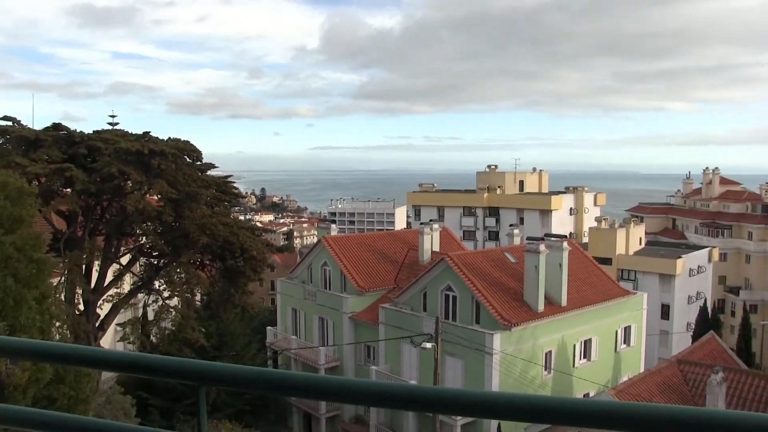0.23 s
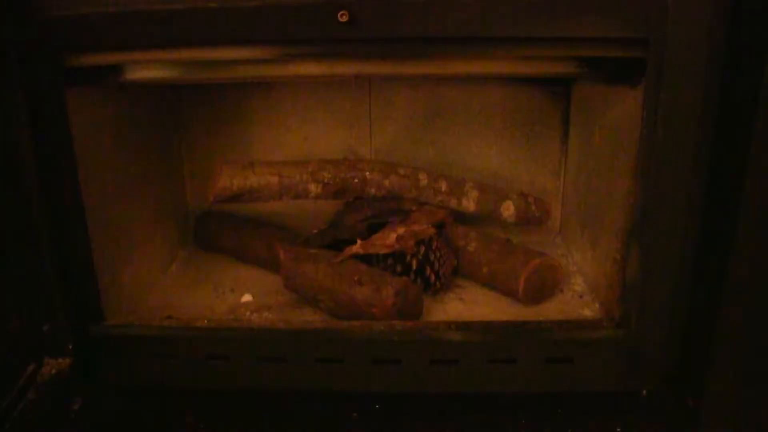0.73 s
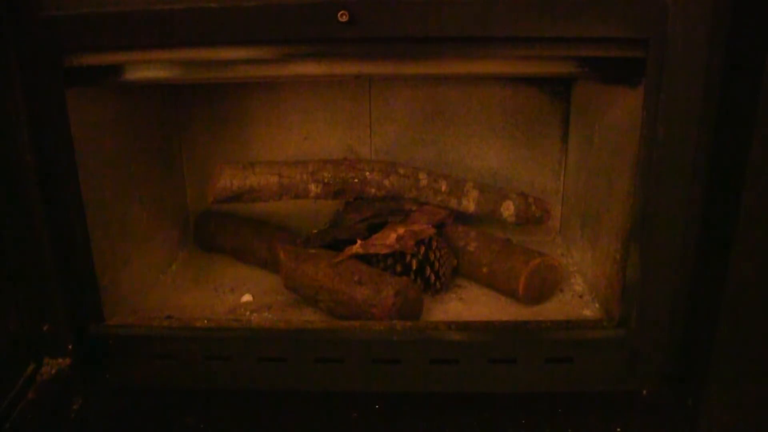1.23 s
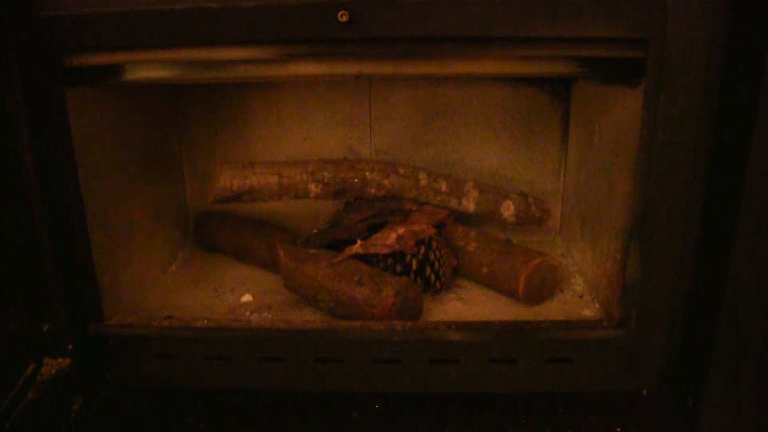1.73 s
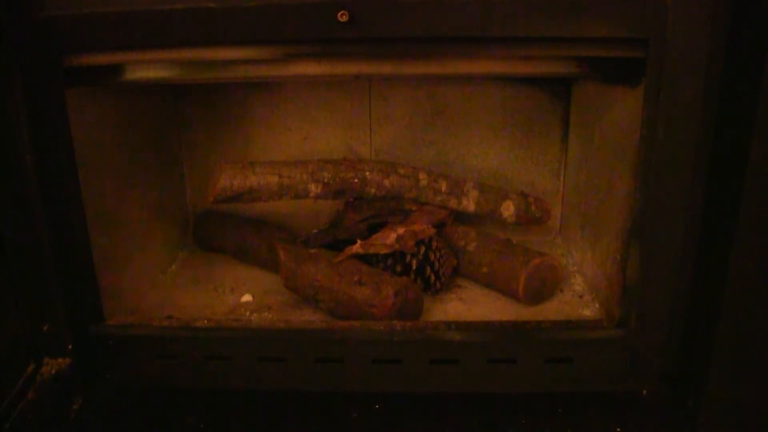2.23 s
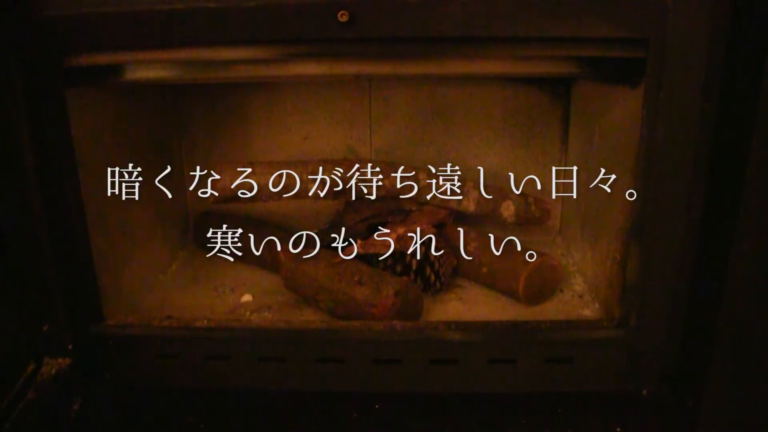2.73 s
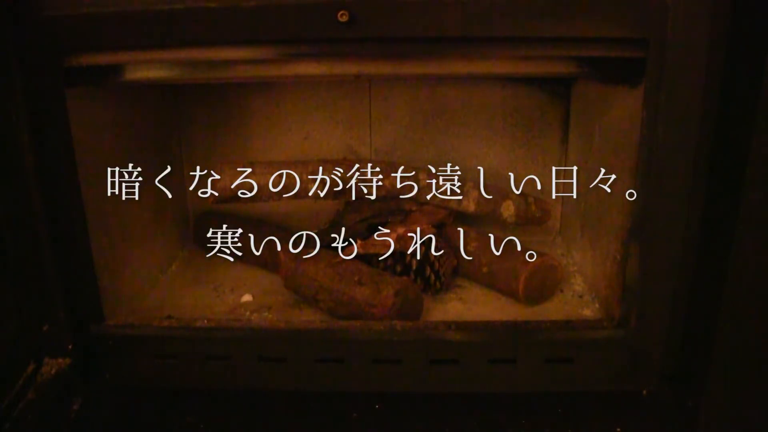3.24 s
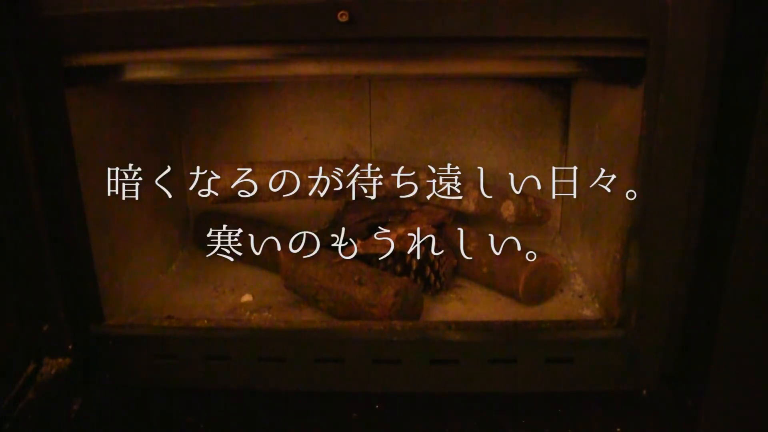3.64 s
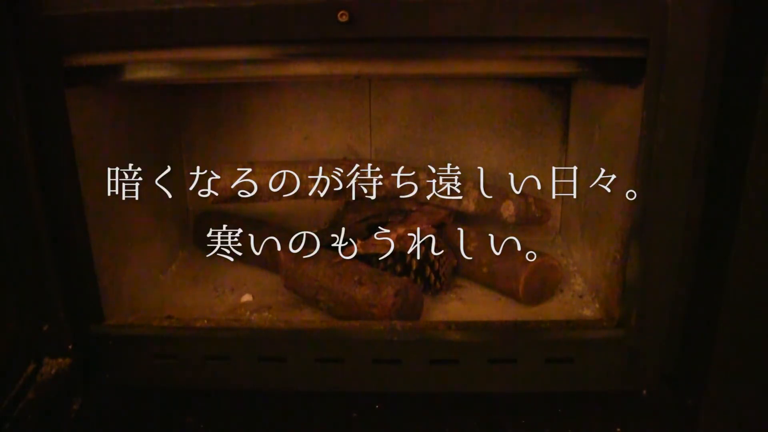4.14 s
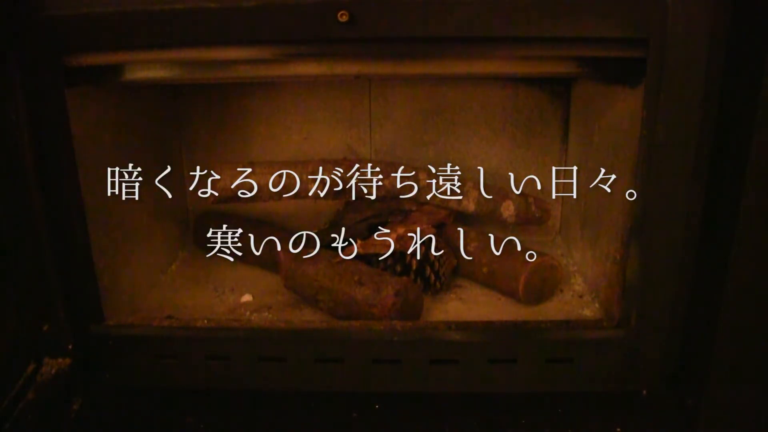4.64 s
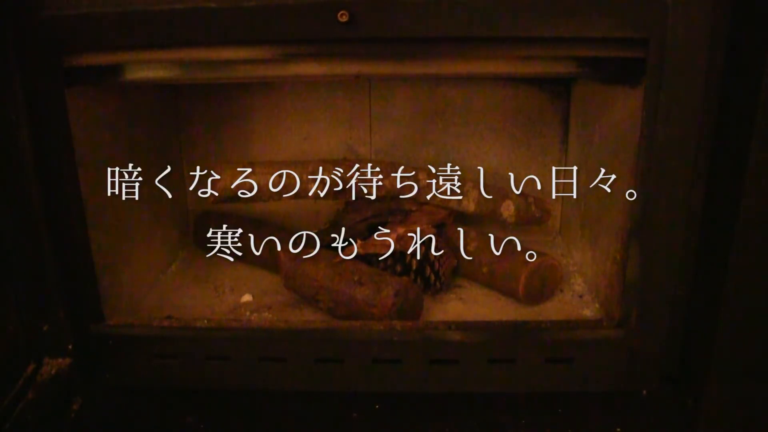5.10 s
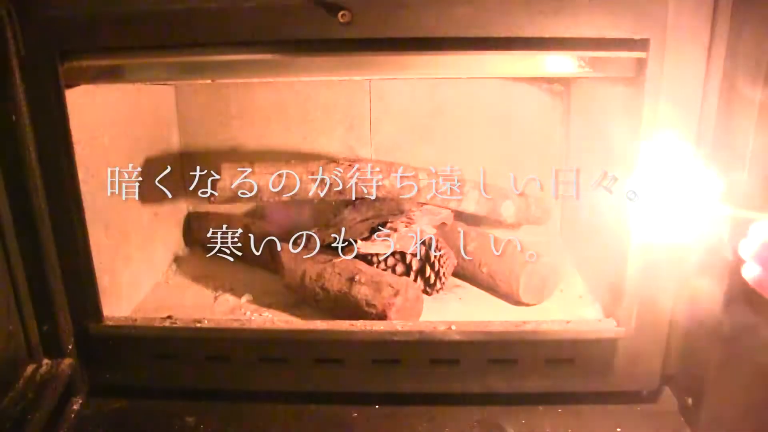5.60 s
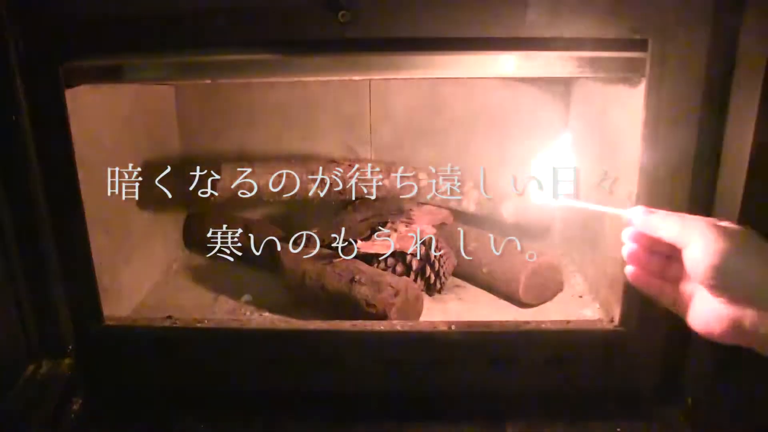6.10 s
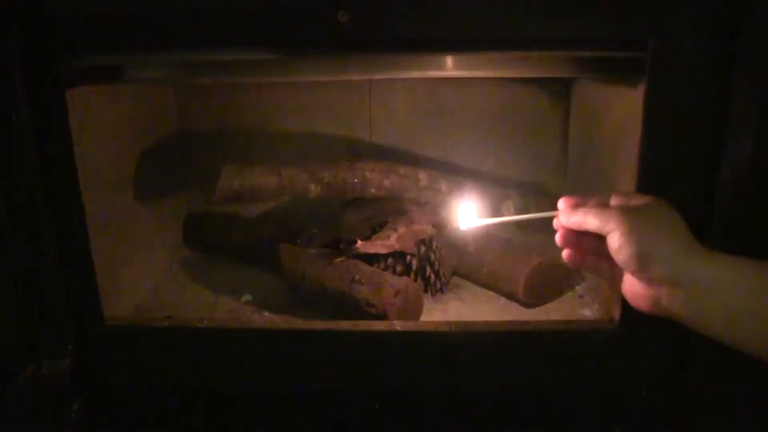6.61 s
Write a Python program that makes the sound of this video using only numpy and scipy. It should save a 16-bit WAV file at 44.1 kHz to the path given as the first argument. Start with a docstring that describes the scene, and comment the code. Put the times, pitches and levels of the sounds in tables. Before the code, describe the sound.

After brief seaside birdsong, cardboard matchbox clicks and rustles indoors; two short match scrapes, a crackling flare, a hard knock and soft flame hiss.

```python
"""Outdoors, surf and a whistling bird are heard; then a quiet, echoing room with a cold stove.
A cardboard matchbox is handled and a wooden match is struck twice; the second stroke lights it.
The head sputters, the box is put down with a knock, and the flame hisses on.
Surf, flame and steady hiss are coloured noise; the bird is gliding tones.
Box and match are small knocks and slips that set resonances ringing, with echoes added."""
import sys
import numpy as np
from scipy import signal
from scipy.fft import rfft, irfft
from scipy.io import wavfile
from scipy.ndimage import uniform_filter1d

SR = 44100
rng = np.random.default_rng(int(sys.argv[2]) if len(sys.argv) > 2 else 0)


def waveform_to_disk(signal):
    """Save audio, clipped to [-1, 1], as 16-bit WAV at the path in sys.argv[1]."""
    frames = np.transpose(np.atleast_2d(signal))
    scaled = np.clip(frames, -1, 1) * 32767
    samples = np.round(scaled).astype(np.int16)
    wavfile.write(sys.argv[1], SR, samples)


N = 302526
TIME = np.arange(N) / SR


def from_db(db):
    """Turn decibels into a plain gain."""
    return 10 ** (np.asarray(db) / 20)


def rms_one(x):
    """Scale a sound to an rms level of 1."""
    return x / np.sqrt(np.mean(x ** 2) + 1e-20)


def level(rows):
    """Gain over time, gliding between rows of (t/s, level/dB) and held before and after them."""
    return from_db(np.interp(TIME, *np.transpose(rows)))


def swells(rows, attack_s, release_s):
    """Gain over time of gestures (t/s, length/s, level/dB) that rise, hold and die away."""
    out = 0
    for s, length, db in rows:
        t = np.maximum(TIME - s, 0)
        rise = 1 - np.exp(-t / attack_s)
        fall = np.exp(-np.maximum(t - length, 0) / release_s)
        out = out + from_db(db) * rise * fall
    return out


def at_hz(points, hz):
    """Read a table of (f/Hz, value) between its points, on a log-frequency axis."""
    freqs, values = np.transpose(points)
    return np.interp(np.log(hz + 1e-9), np.log(freqs), values)


def stereo_noise(colour, likeness, size):
    """Noise coloured by frequency; a shared part and an opposed part set how alike left and right are."""
    hz = np.fft.rfftfreq(size, 1 / SR)
    mid, side = rfft(rng.standard_normal((2, size)))
    alike = np.clip(at_hz(likeness, hz), -1, 1)
    pair = np.sqrt(1 + alike) * mid + np.sqrt(1 - alike) * side * [[1], [-1]]
    return rms_one(irfft(pair * from_db(at_hz(colour, hz)), size))


def glides(rows, tremble):
    """Short trembling tones (t/s, length/s, first f/Hz, last f/Hz, level/dB) that swell and fade."""
    out = np.zeros(N)
    for s, length, first_hz, last_hz, db in rows:
        unsteady = rms_one(uniform_filter1d(rng.standard_normal(N), size=64))
        along = np.clip((TIME - s) / length, 0, 1)
        pitch = (first_hz + (last_hz - first_hz) * along) * (1 + tremble * unsteady)
        tone = np.sqrt(2) * np.sin(2 * np.pi * np.cumsum(pitch) / SR)
        out += from_db(db) * np.sin(np.pi * along) * tone
    return out


def resonate(x, modes):
    """Ring side-by-side resonances (f/Hz, width/Hz, level/dB) with alternating signs."""
    out = 0
    for k, (hz, width, db) in enumerate(modes):
        r = np.exp(-np.pi * width / SR)      # a wider resonance dies away faster
        poles = [1, -2 * r * np.cos(2 * np.pi * hz / SR), r * r]
        ring = (1 - r * r) / 2 * signal.lfilter([1, 0, -1], poles, x + 1e-18)
        out = out + (-1) ** k * from_db(db) * ring
    return out


def grains(per_s, spread_db, size):
    """Tiny slips of uneven strength and either direction at random moments."""
    strength = from_db(spread_db * np.minimum(rng.exponential(1, size), 4))
    return (rng.random(size) < per_s / SR) * strength * rng.choice([-1, 1], size)


def scrape(pressure, snap):
    """A snap, then dense slips under the pressure; snap is the share of the first impact."""
    slips = grains(14000, 2.89, len(pressure)) * pressure
    for _ in range(3):      # the slips excite all pitches about evenly
        spectrum = rfft(slips)
        slips = irfft(spectrum / (abs(spectrum) + 1e-12), len(pressure)) * np.sqrt(pressure)
    share = np.clip(snap, 0, 1)
    force = np.sqrt(1 - share ** 2) * slips / np.sqrt(np.sum(slips ** 2) + 1e-20)
    force[0] -= share
    return force


def contacts(rows, box_modes, bright_modes, low_modes, snap, rise_s, release_s):
    """Each contact rings the box panels, the bright surface modes and the low hollow."""
    size = SR // 10
    t, out = np.arange(size) / SR, np.zeros(N + size)
    for s, length, box_hz, box_db, bright_db, thump_db in rows:
        press = 1 - np.exp(-(t + 1 / SR) / rise_s)      # pressure takes a moment to build
        release = np.exp(-np.maximum(t - length, 0) / release_s)
        force = scrape(press * release, snap)
        box = [(ratio * box_hz, width, db) for ratio, width, db in box_modes]
        # every spot on the surface rings a little differently
        shifts = 1 + 0.1 * rng.uniform(-1.16, 1, len(bright_modes))
        bright = [(hz * shift, width, db) for (hz, width, db), shift in zip(bright_modes, shifts)]
        start, loud_part = int(s * SR), t < length + .005
        for modes, db in ((box, box_db), (bright, bright_db), (low_modes, thump_db)):
            # a small panel radiates little below its lowest mode
            low_edge = min(modes[0][0] * 0.96, SR / 4)
            low_cut = signal.butter(2, low_edge, "high", fs=SR, output="sos")
            ring = signal.sosfilt(low_cut, resonate(force, modes))
            loudness = np.sqrt(np.mean(ring[loud_part] ** 2) + 1e-20)
            out[start:start + size] += from_db(db) * ring / loudness
    return out[:N]


# surf and town far below: (t/s, level/dB)
SURF = [(0, -41.5), (.5, -41.5), (.58, -38), (.648, -39), (.658, -100)]
# its balance of bass and treble: (f/Hz, level/dB)
SURF_COLOUR = [(20, -43), (50, -16), (100, -9.5), (165, 1.5), (300, -2), (560, 0), (800, -6.5),
               (1600, -12.5), (3000, -23), (5000, -28), (8000, -32.5), (16000, -46)]
# how alike left and right are: (f/Hz, likeness from -1 to 1)
SURF_LIKENESS = [(60, 0.88), (240, 0.91), (950, 0.68), (3770, 0.19), (15000, 0.89)]


def surf():
    """Far-off surf and town blend into one dull, wide rush of noise."""
    return level(SURF) * stereo_noise(SURF_COLOUR, SURF_LIKENESS, size=N)


# colour of the steady hiss: (f/Hz, level/dB)
HISS_COLOUR = [(15, -65), (25, -30), (49, -17), (97, -6), (127, -16.5), (195, -2), (229, -11.5), (277, -4),
               (335, -4.5), (476, -8.5), (560, -1.5), (659, -8.5), (1480, -12), (8140, -24), (16000, -30)]
# how alike left and right are: (f/Hz, likeness from -1 to 1)
HISS_LIKENESS = [(60, 1), (180, 0.38), (550, 0.061), (1650, 0.3), (4970, 0.51), (15000, 0.53)]
HISS_DB = -56.5


def steady_hiss():
    """A faint noise of unchanging level lies under everything."""
    return from_db(HISS_DB) * stereo_noise(HISS_COLOUR, HISS_LIKENESS, size=N)


# two drawn-out bird whistles, each a list of: (t/s, f/Hz, level/dB)
WHISTLES = [
    [(.015, 3810, -64), (.048, 4145, -50.5), (.125, 3920, -60), (.18, 4210, -56), (.235, 4700, -60)],
    [(.465, 3750, -55), (.49, 3894, -56), (.58, 3850, -57), (.61, 3990, -63), (.645, 4290, -60)],
]


def whistles():
    """Thin gliding whistles whose pitch trembles slightly."""
    out = np.zeros(N)
    for whistle in WHISTLES:
        s, hz, db = np.transpose(whistle)
        tremble = rms_one(uniform_filter1d(rng.standard_normal(N), SR // 400))
        pitch = np.interp(TIME, s, hz) * (1 + 0.0094 * tremble)
        gate = np.clip(np.minimum(TIME - s[0], s[-1] - TIME) / 0.0051, 0, 1)
        tone = np.sqrt(2) * np.sin(2 * np.pi * np.cumsum(pitch) / SR)
        out += gate * from_db(np.interp(TIME, s, db)) * tone
    return out


# house fronts throw the bird's song back: (delay t/s, level/dB)
WALL_ECHOES = [(0.03, -5.5), (.07, -12), (.125, -10), (.19, -15)]


def wall_echo(x):
    """Each house front returns a later, weaker copy of the sound."""
    return x + sum(from_db(db) * np.interp(TIME - delay_s, TIME, x, left=0) for delay_s, db in WALL_ECHOES)


# the bird's short chips: (t/s, length/s, first f/Hz, last f/Hz, level/dB)
CHIPS = [(.23, 0.012, 2670, 2300, -50.5), (.308, 0.043, 5840, 6700, -55), (.453, 0.0165, 2460, 3080, -56)]
OUTDOORS_END_S = .655


def bird():
    """Whistles and chips with their echoes, cut off where the outdoor scene ends."""
    song = whistles() + glides(CHIPS, tremble=0.011)
    return wall_echo(song) * (TIME < OUTDOORS_END_S)


# how alike left and right are indoors: (f/Hz, likeness from -1 to 1)
ROOM_LIKENESS = [(100, 1), (500, 0.82), (1200, 0.73), (3000, 0.55), (6000, 0.6), (12000, 0.75)]
# time the echoes take to fall by 60 dB: (f/Hz, decay t/s)
ROOM_T60 = [(100, 0.99), (300, 0.61), (1500, 0.77), (5000, 0.63), (9000, 0.61), (15000, 0.34)]
# colour of the echoes at their start: (f/Hz, level/dB)
ROOM_COLOUR = [(100, 3), (400, -3), (800, -1.5), (1020, -0.5), (1400, 0.5), (1950, 4), (2600, 6.5),
               (6000, -0.5), (10000, -0.5), (15000, 3)]


def room_tail(build_s):
    """Diffuse echoes swell, then die away, each pitch range at its own pace."""
    t, hz = np.arange(SR) / SR, np.fft.rfftfreq(SR, 1 / SR)
    noise = rfft(stereo_noise(ROOM_COLOUR, ROOM_LIKENESS, size=SR))
    centres, tail = np.geomspace(100, 15000, 12), 0
    for centre, share in zip(centres, np.eye(len(centres))):
        band = irfft(noise * at_hz(np.c_[centres, share], hz), SR)
        tail = tail + band * from_db(-60 * t / at_hz(ROOM_T60, centre))
    tail = tail * (1 - np.exp(-(t / build_s) ** 2))
    return tail / np.sqrt(np.sum(tail ** 2) / 2)


def near_echoes(decay_s):
    """The stove front and the floor scatter sound into each channel differently."""
    t = np.arange(SR // 16) / SR
    colour = [(200, -26), (1000, -7.0), (2500, -1.5), (5000, -7.0), (14000, -6.5)]      # (f/Hz, level/dB)
    likeness = [(200, 0.38), (2500, -0.29), (8000, 0.4)]      # (f/Hz, likeness)
    scatter = stereo_noise(colour, likeness, size=len(t))
    scatter = scatter * np.exp(-t / decay_s) * (1 - np.exp(-t / 0.001))
    return scatter / np.sqrt(np.sum(scatter ** 2) / 2)


def in_room(x, near, tail, near_db, tail_db, pan_db):
    """Direct sound plus near reflections and the room's tail; positive pan leans to the left."""
    echoes = from_db(tail_db) * tail
    echoes[:, :near.shape[1]] += from_db(near_db) * near
    direct = x * from_db([[pan_db / 2], [-pan_db / 2]])
    return direct + signal.fftconvolve(x[None], echoes, axes=1)[:, :N]


# cloth brushes softly: (t/s, length/s, level/dB)
SLEEVE = [(2.05, 0.28, -54.5)]
SLEEVE_ATTACK_S, SLEEVE_RELEASE_S = 0.094, 0.076


def rustle(sliding):
    """Skin drags over cardboard; cloth brushes at a lower pitch."""
    skin = resonate(grains(1700, 1.6, size=N), [(824, 620, -4), (2110, 670, -5.5), (4760, 4300, -16.0)])
    cloth = resonate(grains(1200, 4.7, size=N), [(326, 84, 0), (530, 81, 0)])
    brushing = swells(SLEEVE, SLEEVE_ATTACK_S, SLEEVE_RELEASE_S)
    return sliding * rms_one(skin) + brushing * rms_one(cloth)


# sliding fingers catch now and then; levels are relative to the slide
CATCHES_PER_S, CATCH_S, CATCH_HZ = 16, 0.0071, 847
CATCH_BOX_DB, CATCH_SCRATCH_DB, CATCH_SPREAD_DB = 0, -6.5, 7


def catches(sliding, count):
    """Contacts at random moments, with strengths that vary around that of the slide."""
    rows, s = [], 0
    for wait, box, scratch in rng.random((count, 3)):
        s += 2 * wait / CATCHES_PER_S
        slide_db = 20 * np.log10(np.interp(s, TIME, sliding) + 1e-9)
        if s < TIME[-1] and slide_db > -75:      # fingers at rest do not catch
            box_db = slide_db + CATCH_BOX_DB + CATCH_SPREAD_DB * (2 * box - 1)
            scratch_db = slide_db + CATCH_SCRATCH_DB + CATCH_SPREAD_DB * (2 * scratch - 1)
            rows.append((s, CATCH_S, CATCH_HZ, box_db, scratch_db))
    return rows


# the tray glides out of its sleeve with a soft hiss: (t/s, length/s, level/dB)
TRAY = [(1.93, .45, -60.5)]
# resonances of that hiss: (f/Hz, width/Hz, level/dB)
TRAY_MODES = [(1090, 610, 3.5), (2160, 1150, -2), (5200, 1000, 0), (12100, 1100, -11)]
# the tray squeaks faintly in its sleeve: (t/s, length/s, first f/Hz, last f/Hz, level/dB)
SQUEAKS = [(1.85, .14, 12500, 13100, -67), (2.03, .14, 15600, 14200, -73), (2.23, 0.11, 14000, 12400, -70),
           (2.42, 0.12, 13900, 13100, -74)]


def tray():
    """The tray rubs along its sleeve: dense slips hiss and thin high tones squeak."""
    hiss = rms_one(resonate(grains(6000, 2.9, size=N), TRAY_MODES))
    return swells(TRAY, attack_s=0.039, release_s=0.034) * hiss + glides(SQUEAKS, tremble=0.0063)


# dull bumps of the hand on the box: (t/s, length/s, level/dB)
BUMPS = [(2.285, .01, -45), (4.914, 0.0084, -47), (5.651, .005, -45), (5.675, 0.0069, -42),
         (5.799, .006, -44), (5.962, 0.0055, -42)]
# hollow of the box in the hand: (f/Hz, width/Hz, level/dB)
THUMP_MODES = [(204, 63, -6.5), (291, 88, 3.5), (398, 292, 2), (590, 315, -0.5)]


def bumps():
    """The soft hand sounds only the hollow of the box."""
    hollow = rms_one(resonate(grains(6000, 3.0, size=N), THUMP_MODES))
    return swells(BUMPS, attack_s=0.0011, release_s=0.0079) * hollow


# fingers slide over the box: (t/s, length/s, level/dB)
SLIDES = [(.73, 0.37, -58), (1.06, 0.18, -66.5), (1.64, 0.067, -48), (2.36, 0.25, -55), (2.52, 0.38, -59.5),
          (2.98, 0.093, -55), (3.3, 0.15, -56)]
SLIDE_ATTACK_S, SLIDE_RELEASE_S = .03, .09
# fingers and matches touch the box: (t/s, length/s, box f/Hz, box level/dB, scratch level/dB)
TOUCHES = [(.752, 0.01, 1200, -47.5, -53), (.766, 0.0067, 1190, -43.5, -53), (.8, 0.0067, 1300, -46.5, -54),
           (.8245, .003, 1070, -46, -42), (.846, .008, 965, -37.5, -51), (1.033, .005, 920, -42.5, -55),
           (1.061, 0.016, 804, -44, -51.5), (1.077, 0.0212, 910, -43.5, -45),
           (1.422, 0.0203, 900, -48, -57.5), (1.47, 0.017, 920, -51.5, -55),
           (1.542, 0.0071, 1087, -30.5, -34), (1.562, 0.0018, 1100, -47, -40.5),
           (1.668, 0.01, 930, -45, -60), (1.68, 0.012, 746, -32.5, -39), (1.84, 0.006, 870, -39.5, -40),
           (1.865, .006, 775, -39.5, -55), (2.456, 0.0047, 880, -47.5, -51.5),
           (2.527, 0.0044, 830, -39.5, -42), (2.542, 0.0096, 810, -38, -50), (2.556, .017, 810, -47, -41.5),
           (2.591, 0.008, 792, -37.5, -60), (2.675, 0.018, 960, -53, -48), (2.821, 0.0046, 860, -40.5, -46),
           (2.8855, 0.0065, 844, -36, -37.5), (3.3, .016, 937, -39.5, -43),
           (3.335, 0.005, 1030, -47, -46.5), (3.356, 0.013, 1170, -41.5, -39),
           (3.375, 0.0076, 1060, -39.5, -37.5), (3.402, .0045, 834, -48, -47),
           (3.545, 0.0044, 1190, -52.5, -52), (4.712, 0.031, 1030, -47.5, -44)]
TOUCH_THUMP_DB = -10   # the hollow of the box, relative to its panels
# resonances of the loosely held box: (multiple of box f, width/Hz, level/dB)
LOOSE_MODES = [(.76, 224, -2.5), (.94, 151, 5), (1.5, 430, -6.5), (2.25, 657, -11.5)]
# resonances of lightly scratched cardboard: (f/Hz, width/Hz, level/dB)
SCRATCH_MODES = [(2097, 470, 6), (3610, 233, 2), (4640, 840, -4.5), (8200, 3600, -10.5),
                 (13100, 4500, -19.5)]


def handling():
    """The box is turned and opened: touches, bumps, sliding fingers and a squeaking tray."""
    sliding = swells(SLIDES, SLIDE_ATTACK_S, SLIDE_RELEASE_S)
    touches = [(s, length, hz, db, scratch_db, db + TOUCH_THUMP_DB)
               for s, length, hz, db, scratch_db in list(TOUCHES) + catches(sliding, count=100)]
    clicks = contacts(touches, LOOSE_MODES, SCRATCH_MODES, THUMP_MODES,
                      snap=0.4, rise_s=0.00061, release_s=0.0023)
    return clicks + bumps() + rustle(sliding) + tray()


# the match is drawn along the strip:
# (t/s, length/s, force level/dB, box f/Hz, judder f/Hz, judder level/dB, judder length/s)
STRIKES = [(4.472, .015, -.5, 1326, 1479, -14.5, 0.0087), (5.11, .027, -2, 1263, 1213, -21.5, 0.029)]
# the box rings on after a stroke: level relative to the judder, and time to fall by 60 dB
RING_DB, RING_T60_S = -17.5, 0.62


def judder(release_s, wobble):
    """The head catches and lets go in quick cycles, so the stroke has a brief pitch that rings on."""
    out, t = np.zeros(N), np.arange(SR) / SR
    for s, _, _, _, hz, db, length in STRIKES:
        grip = (1 - np.exp(-t * hz)) * np.exp(-np.maximum(t - length, 0) / release_s)
        unsteady = rms_one(uniform_filter1d(rng.standard_normal(len(t)), size=64))
        phase = 2 * np.pi * np.cumsum(hz * (1 + wobble * unsteady * grip)) / SR
        ring_decay = np.exp(-np.log(1000) * t / RING_T60_S)
        ring = (1 - np.exp(-t / length)) * from_db(RING_DB) * ring_decay
        tone = np.sqrt(2) * (grip + ring) * np.sin(phase)
        out[int(s * SR):int(s * SR) + len(t)] += from_db(db) * tone
    return out


# each stroke bites, drags, tears free and trails off; levels are relative to its force:
# (start and length as shares of the stroke, box level/dB, rasp level/dB, thump level/dB)
STROKE_PHASES = [(0, 0.077, -12, -24.5, -43), (.22, 0.367, -16, -15.5, -37),
                 (0.599, .37, -16.5, -13.5, -25.5), (1.12, 0.11, -15.5, -37, -33.5)]
# resonances of the box gripped for striking: (multiple of box f, width/Hz, level/dB)
GRIPPED_MODES = [(.64, 218, -6.5), (.85, 230, -3.5), (1.0, 109, 3), (1.17, 200, -4), (1.55, 503, -14.5)]
# resonances of the scraped stick and strip: (f/Hz, width/Hz, level/dB)
RASP_MODES = [(2350, 370, -1.5), (4070, 940, -3.5), (4800, 460, -1), (5760, 130, 5), (6640, 770, 0.5),
              (7400, 1500, -2), (10280, 1750, -5), (14500, 1000, -9.5)]
# the hand and box jolted by a stroke: (f/Hz, width/Hz, level/dB)
JOLT_MODES = [(87, 45, -11), (214, 25, -0.5), (358, 76, 4), (545, 730, -6)]


def strikes():
    """Both strokes scrape through the same phases, the second more slowly."""
    jerks = [(s + start * length, share * length, box_hz, db + box_db, db + rasp_db, db + thump_db)
             for s, length, db, box_hz, *_ in STRIKES
             for start, share, box_db, rasp_db, thump_db in STROKE_PHASES]
    rasp = contacts(jerks, GRIPPED_MODES, RASP_MODES, JOLT_MODES,
                    snap=.3, rise_s=0.00045, release_s=0.0035)
    return rasp + judder(release_s=0.0025, wobble=.014)


# hiss of the flame: (t/s, level/dB)
FLAME = [(5.2, -67), (5.45, -45.5), (5.9, -49), (6.3, -58), (6.45, -59.5), (6.6, -54), (6.75, -53),
         (6.86, -50.5)]
# its balance of bass and treble: (f/Hz, level/dB)
FLAME_COLOUR = [(100, -31), (700, 0), (1300, -3), (2700, -3), (4200, -3.5), (7000, -5.5), (11000, -14),
                (16000, -22)]


def flame():
    """The flame is noise that flares up, sinks and grows again."""
    return level(FLAME) * stereo_noise(FLAME_COLOUR, ROOM_LIKENESS, size=N)


# the head flares up and sputters: (t/s, length/s, level/dB)
SPUTTER = [(5.5, 0.12, -36), (5.795, 0.035, -36.5), (5.83, .15, -40), (5.98, 0.053, -36)]
FLARE_ATTACK_S, FLARE_RELEASE_S = 0.0083, 0.027
# the loudest pops of the burning head: (t/s, length/s, level/dB)
POPS = [(5.425, 0.003, -34), (5.434, 0.0016, -32), (5.445, 0.0045, -34.5), (5.466, 0.0041, -31.5),
        (5.534, 0.0067, -23.5), (5.551, 0.0043, -40), (5.619, 0.0036, -52), (5.819, 0.005, -36),
        (5.872, .005, -31), (5.898, 0.0037, -26), (5.961, 0.0037, -34), (5.984, 0.0046, -32),
        (5.997, 0.0127, -31)]
POP_HZ, POP_FIZZ_DB, POP_THUMP_DB = 973, -5.5, -19   # pitch of a pop; its treble and bass, relative to it
# the fizz of a pop: (f/Hz, width/Hz, level/dB)
FIZZ_MODES = [(2120, 570, 7.5), (3350, 970, -0.5), (4600, 950, -3), (7800, 3300, -9.5)]


def sputter():
    """Small bursts of gas break out of the burning head, a few of them loud."""
    gas_modes = [(340, 190, -6.5), (924, 220, -1), (1440, 200, 0.5), (2050, 700, -7.0), (6000, 11000, -25.5)]
    small = resonate(grains(450, 2.8, size=N), gas_modes)
    pops = [(s, length, POP_HZ, db, db + POP_FIZZ_DB, db + POP_THUMP_DB) for s, length, db in POPS]
    loud = contacts(pops, LOOSE_MODES, FIZZ_MODES, THUMP_MODES, snap=0.34, rise_s=0.001, release_s=0.0035)
    return swells(SPUTTER, FLARE_ATTACK_S, FLARE_RELEASE_S) * rms_one(small) + loud


# the box is put down and rebounds:
# (t/s, length/s, box f/Hz, box level/dB, crack level/dB, thump level/dB)
KNOCK = [(6.0296, 0.00271, 836, -14, -21, -28.5), (6.041, 0.0029, 870, -24, -43, -34)]
# resonances of the box meeting a hard surface: (multiple of box f, width/Hz, level/dB)
KNOCK_MODES = [(.62, 119, -2.5), (.76, 150, 0), (.97, 128, 5), (1.13, 120, 2.5), (2.0, 545, -11.5)]
# the crack of that landing: (f/Hz, width/Hz, level/dB)
CRACK_MODES = [(1950, 380, -26), (3860, 620, 3), (5260, 820, 6), (9500, 1950, 1), (13500, 4700, -12)]


def knock():
    """The box lands mostly as one sharp impact, then a weaker one from the rebound."""
    return contacts(KNOCK, KNOCK_MODES, CRACK_MODES, THUMP_MODES, snap=0.8, rise_s=0.00049, release_s=0.0037)


def scene():
    """The view outdoors, then the match at the stove."""
    outdoors = surf() + bird()
    near, tail = near_echoes(decay_s=0.011), room_tail(build_s=0.021)
    indoors = in_room(handling() + sputter(), near, tail, near_db=0.45, tail_db=-5.5, pan_db=-2.5)
    indoors += from_db(-3.0) * in_room(strikes(), near, tail, near_db=-2.5, tail_db=-4.5, pan_db=-3.0)
    indoors += from_db(-1.1) * in_room(knock(), near, tail, near_db=0, tail_db=-1.6, pan_db=2.5)
    return outdoors + indoors + flame() + steady_hiss()


CUTOFF_HZ = 16000


def record(dry):
    """The treble above the cutoff is removed steeply."""
    return signal.sosfilt(signal.ellip(10, .1, 80, CUTOFF_HZ, fs=SR, output="sos"), dry)


dry = scene()
out = record(dry)
waveform_to_disk(out)
```